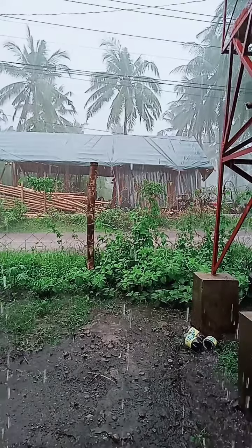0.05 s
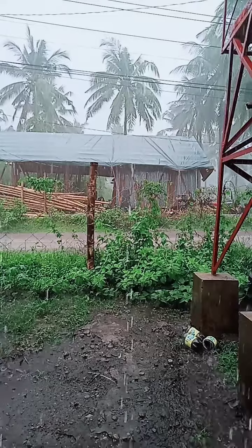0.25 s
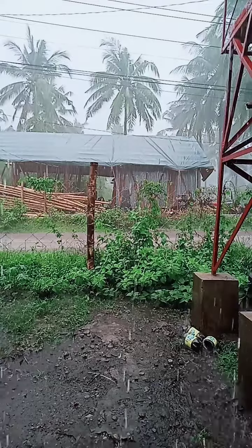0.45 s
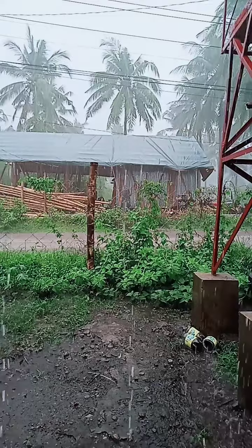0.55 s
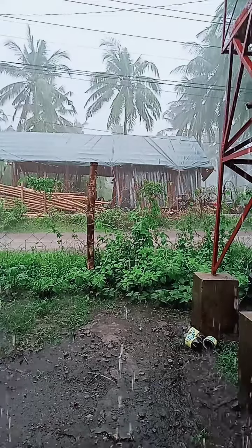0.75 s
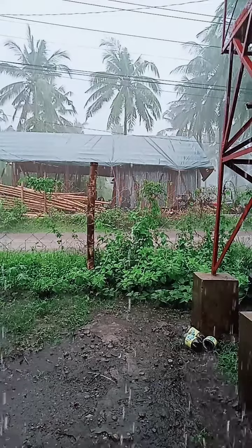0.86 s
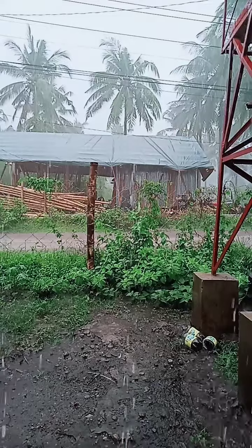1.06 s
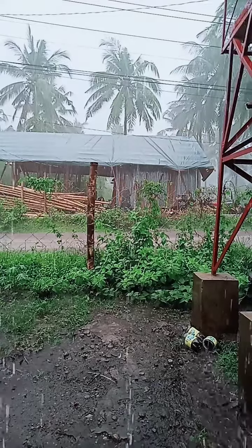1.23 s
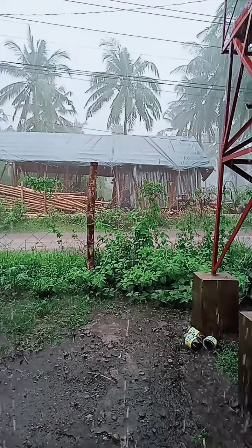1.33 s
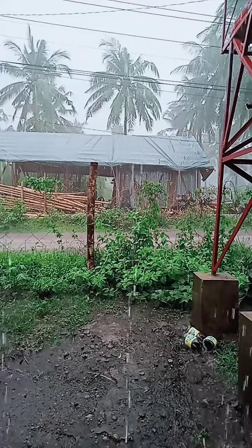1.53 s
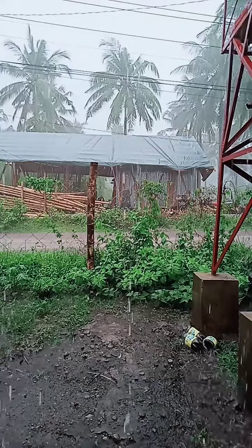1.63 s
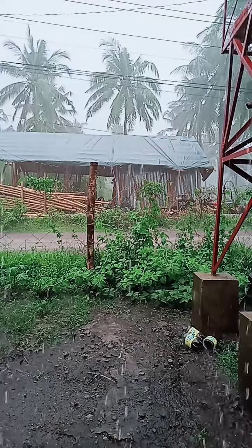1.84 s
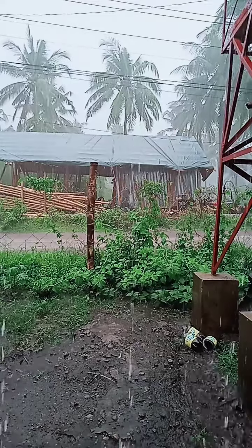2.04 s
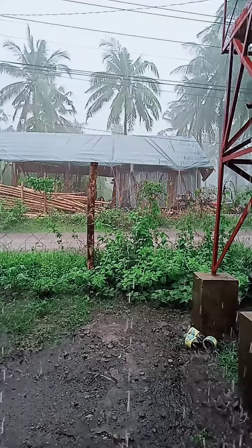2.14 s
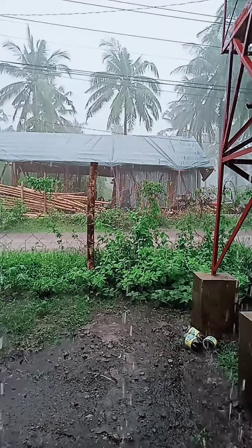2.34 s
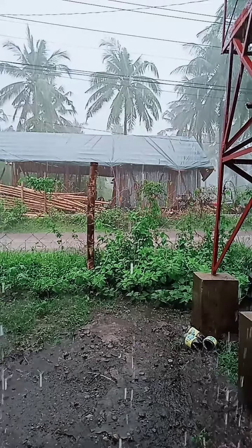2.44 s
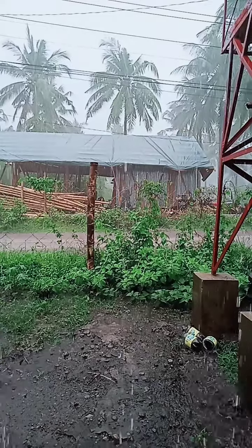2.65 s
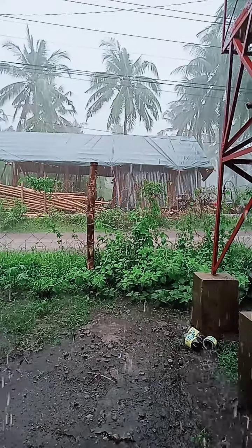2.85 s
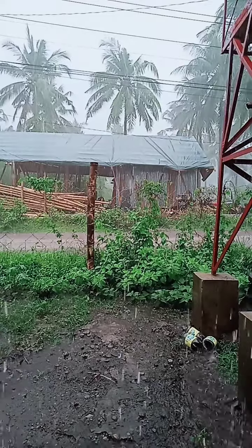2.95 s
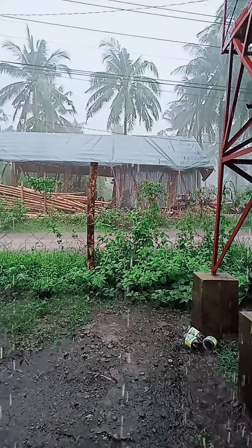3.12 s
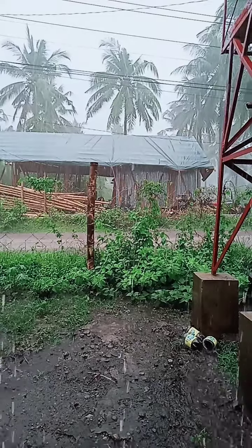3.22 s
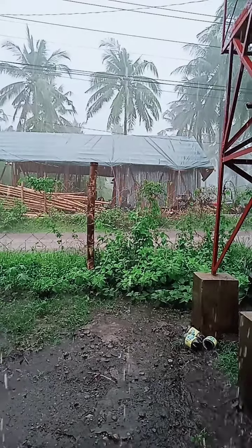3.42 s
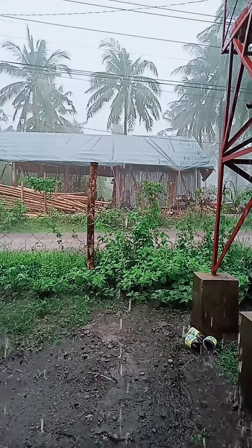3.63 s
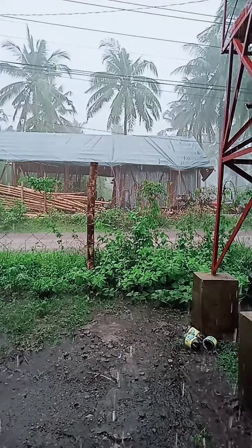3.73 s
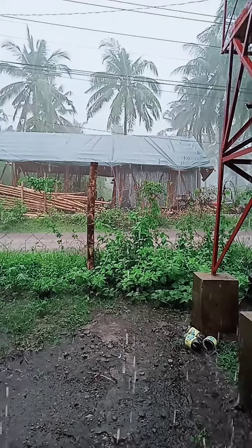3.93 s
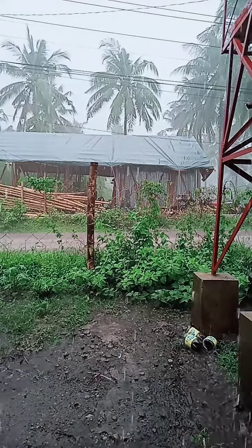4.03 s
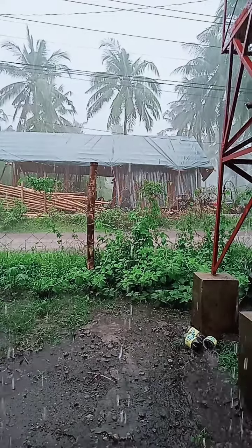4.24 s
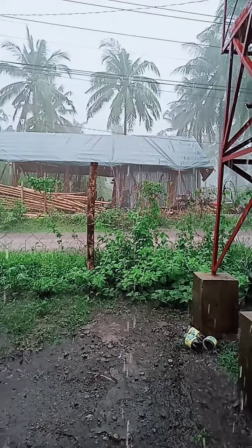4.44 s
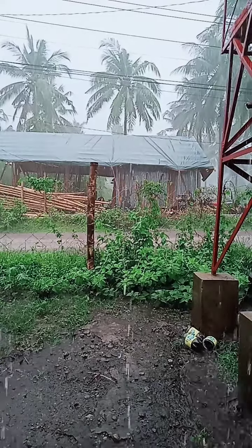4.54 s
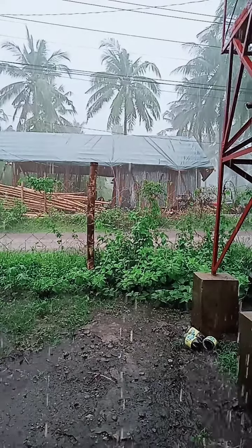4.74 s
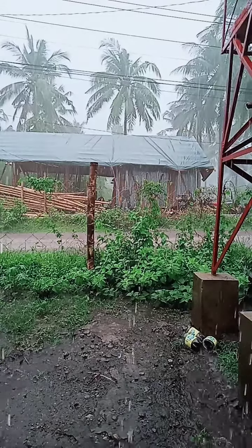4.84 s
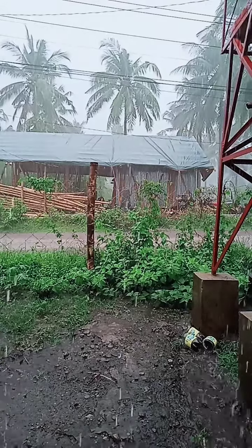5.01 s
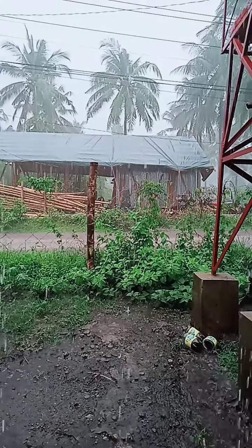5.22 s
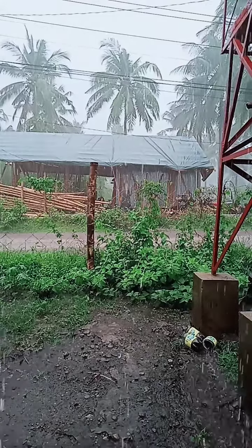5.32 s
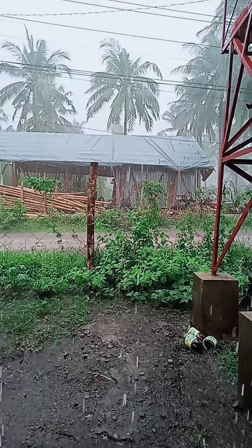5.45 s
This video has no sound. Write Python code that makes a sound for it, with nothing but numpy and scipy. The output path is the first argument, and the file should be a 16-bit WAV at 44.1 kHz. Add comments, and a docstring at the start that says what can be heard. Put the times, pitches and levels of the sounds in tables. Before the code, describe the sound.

Steady heavy rain on a sheet-metal roof, heard from beneath its edge. Countless drops merge into a dense midrange roar, with small damped metallic taps barely standing out. A very faint hiss of splashes and spray comes from the muddy yard, and a soft low rumble from distant roofs. The rain thickens slightly around the middle, then eases. Close, sheltered microphone, mono, short diffuse reverberation.

```python
"""A steady roar of heavy tropical rain, heard throughout from under the edge of a sheet-metal roof.
Countless random impacts excite the resonant sheets and merge; short damped tones tap through as bigger drops.
Splashes and spray on the muddy yard in front are impulses and patchy noise, filtered to a hiss.
Distant roofs add a low rumble of filtered noise. Two surges of heavier rain build up and ease off."""
import sys
import numpy as np
from scipy import signal
from scipy.fft import rfft, irfft, next_fast_len
from scipy.io import wavfile
from scipy.ndimage import uniform_filter1d, map_coordinates

SR = 44100
rng = np.random.default_rng(int(sys.argv[2]) if len(sys.argv) > 2 else 0)


def int16_out(signal):
    """Quantize to a 16-bit WAV file."""
    q = np.round(np.clip(np.atleast_2d(signal).T, -1, 1) * 32767)
    wavfile.write(sys.argv[1], SR, q.astype(np.int16))


N = 386316  # length in samples


# One drop on the roof, without its resonances, relative spectral density: freq_hz [Hz], level_db [dB per Hz]
IMPACT = [(60, -43.5), (150, -15.5), (300, -12.5), (540, -7.5), (740, -7), (810, -3), (1200, -.5),
          (1750, -1.64), (2250, -1.46), (3050, -8.5), (3600, -9.5), (4130, -13), (4650, -24.5),
          (11000, -89)]
# Resonances of the roof sheets: centre_hz [Hz], width_hz [Hz], lift_db [dB]
SHEETS = [(645, 65, 3.6), (812, 55, 2.4), (865, 45, 1.4), (995, 80, 3.6), (1275, 80, 1.2), (2010, 200, 2.4)]


def sheet_response(hz):
    """Modal radiation: each resonance of the sheets lifts the broad spectrum of a blow around its centre."""
    level_db = along(IMPACT, hz)
    for centre_hz, width_hz, lift_db in SHEETS:
        detuning = 2 * (hz - centre_hz) / width_hz
        level_db = level_db + lift_db / (1 + detuning ** 2)
    return level_db


def roof():
    """Superposition: drops overhead patter, heavy ones ring the metal, and the rest of the roof roars."""
    patter = drops(rate_per_s=3000, spread_db=3)
    taps = rings(centre_hz=1492, scatter=0.449, cycles=6.7, spread_db=3.0, count=2400)
    near = sheltered(amp(-5.5) * patter + amp(-23.5) * taps, wet_db=-9)
    far = amp(-0.5) * wash(patchy_db=0.5)
    return coloured(near + far, sheet_response)


# Fine spray on mud and leaves, relative spectral density: freq_hz [Hz], level_db [dB per Hz]
SPRAY = [(2500, -16.5), (4500, 4), (5600, -5), (6150, 1), (7350, 0.5), (8000, -8), (8700, -13.5),
         (9750, -19.5), (10900, -20), (11300, -18.5), (11950, -20), (12900, -21.5), (13500, -16),
         (15500, -18)]


def yard():
    """Impulsive excitation: splashes tick on wet ground in a hiss of spray; a few land close, sharp and dry."""
    splashes = sheltered(drops(rate_per_s=310, spread_db=2), wet_db=-7)
    spray_gain = amp(0.3 * wobble(14))
    spray = spray_gain * wash(patchy_db=0.4)
    close = drops(rate_per_s=22, spread_db=4)  # no reverberation
    return coloured(amp(-9) * splashes + amp(-15) * close + spray, lambda hz: along(SPRAY, hz))


# Distant rumble, relative spectral density: freq_hz [Hz], level_db [dB per Hz]
RUMBLE = [(20, -46), (36, -36), (55, -18.5), (69, -18), (81, -4), (95, -8.5), (113, -8.5), (135, 2),
          (185, -1.8), (275, 1.5), (300, -5), (340, -0.5), (520, -5.5), (4000, -71.5)]


def distance():
    """Spectral filtering: only the low drumming of the downpour carries from far away."""
    return coloured(wash(patchy_db=0.8), lambda hz: along(RUMBLE, hz))


# Surges of heavier rain, each with its own lift: peak_s [s], lift_db [dB]
SURGES = [(4.6, 0.96), (6.2, 0.56)]
BUILD_S, EASE_S = 1, 0.73  # time constants of every surge


def rainfall():
    """Exponential growth and decay: rain strength in dB over its steady level, each surge peaking once."""
    t = np.arange(N) / SR
    surge_db = np.zeros(N)
    for peak_s, lift_db in SURGES:
        time_constants_away = np.maximum((peak_s - t) / BUILD_S, (t - peak_s) / EASE_S)
        surge_db += lift_db * np.exp(-time_constants_away)
    return surge_db


# Reverberation under the roof: freq_hz [Hz], t60_s [s]
SHELTER = [(200, 0.49), (2000, 0.25), (10000, 0.2)]


def sheltered(x, wet_db):
    """Reverberation between roof, wall and ground; drops land all over, so the echo paths keep changing."""
    places = 24  # each serves one span of time with its own echo tail
    noise = rng.standard_normal((places, SR // 4))
    hz, t, z = signal.stft(noise, SR, nperseg=256)
    decay = amp(-60 * t / along(SHELTER, hz)[:, None])
    tails = signal.istft(z * decay, SR, nperseg=256)[1]
    wet = np.zeros(N + SR)
    for span, tail in zip(np.array_split(np.arange(N), places), tails):
        echo = signal.fftconvolve(x[span], tail / np.linalg.norm(tail))
        wet[span[0]:][:len(echo)] += echo
    return unit(x + amp(wet_db) * wet[:N])


def drops(rate_per_s, spread_db):
    """Random arrivals: impulses of either sign and unequal size, at independent moments."""
    size = amp(spread_db * np.minimum(rng.standard_normal(N), 2))
    sign = rng.choice([-1, 1], N)
    lands = rng.random(N) < rate_per_s / SR
    return unit(size * sign * lands)


def rings(centre_hz, scatter, cycles, spread_db, count):
    """Damped oscillation: short tones, each of its own pitch, strength, decay and moment."""
    when, phase = rng.random((count, 2)).T[:, :, None]
    pitch, size, life = np.clip(rng.standard_normal((count, 3)), -2, 2).T[:, :, None]
    t = np.arange(SR // 25) / SR
    turns = centre_hz * np.exp(scatter * pitch) * t
    decay = np.exp(-turns / (cycles * np.exp(life / 3)))  # falls to 1/e in about this many cycles
    tones = amp(spread_db * size) * decay * np.sin(2 * np.pi * (turns + phase))
    index = (when * N).astype(int) + np.arange(len(t))
    return unit(np.bincount(index.ravel(), tones.ravel())[:N])


def wash(patchy_db):
    """Dense superposition: drops too many to tell apart become noise with drifting patches of strength."""
    z = signal.stft(rng.standard_normal(N), nperseg=512)[2]
    field = uniform_filter1d(rng.standard_normal(z.shape), size=6, axis=0)  # smooth over frequency
    field = uniform_filter1d(field, size=16, axis=1)  # smooth over time
    patches = z * amp(patchy_db * unit(field))
    return unit(signal.istft(patches, nperseg=512)[1][:N])


def coloured(x, level_at):
    """Minimum-phase filtering: a causal response of given dB per frequency, so ringing follows each hit."""
    m = 2 * next_fast_len(N // 2 + SR // 4)
    log_gain = np.log(amp(level_at(np.fft.rfftfreq(m, 1 / SR))))
    cepstrum = irfft(log_gain, m)
    # folding the cepstrum onto positive times makes the filter causal
    cepstrum[1:m // 2] *= 2
    cepstrum[m // 2 + 1:] = 0
    response = np.exp(rfft(cepstrum))
    return unit(irfft(rfft(x, m) * response, m)[:N])


def wobble(knots_per_s):
    """Random modulation: a smooth curve of rms 1 through random knots."""
    knots = rng.standard_normal(int(N * knots_per_s / SR) + 4)
    return unit(map_coordinates(knots, [np.arange(N) * knots_per_s / SR]))


def along(points, hz):
    """Logarithmic frequency scale: interpolate the second column of (Hz, value) points."""
    f, v = np.transpose(points)
    return np.interp(np.log(hz + 1), np.log(f + 1), v)


def amp(db):
    """Decibel law: level to amplitude gain."""
    return 10 ** (np.asarray(db) / 20)


def unit(x):
    """Effective value: scale to rms 1."""
    return x / np.sqrt(np.mean(x ** 2) + 1e-20)


ROAR_DB, HISS_DB, RUMBLE_DB = -17, -44.5, -34.5  # roof, yard and distance in the steady rain
HISS_FOLLOWS, RUMBLE_FOLLOWS = 0.4, 0.46  # share of a surge, in dB, that yard and distance take on
FLUTTER_DB, FLUTTER_PER_S = 0.08, 9  # rms and knot rate of quick chance changes in the rain on the roof


def scene():
    """Superposition of sources: heavier rain lifts the roof most; spray and far rumble follow it less."""
    surge_db = rainfall()
    flutter_db = FLUTTER_DB * wobble(FLUTTER_PER_S)
    roar = amp(ROAR_DB + surge_db + flutter_db) * roof()
    hiss = amp(HISS_DB + HISS_FOLLOWS * surge_db) * yard()
    rumble = amp(RUMBLE_DB + RUMBLE_FOLLOWS * surge_db) * distance()
    return (roar + hiss + rumble)[None]


TOP_HZ = 15500  # upper band limit


def record(dry):
    """Band limitation: an ideal low-pass keeps nothing from the limit upward."""
    m = next_fast_len(N + SR // 2)
    passband = np.fft.rfftfreq(m, 1 / SR) < TOP_HZ
    return irfft(rfft(dry, m) * passband, m)[..., :N]


dry = scene()
out = record(dry)
int16_out(out)
```